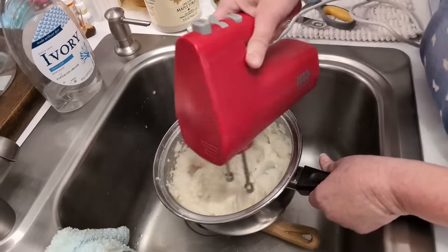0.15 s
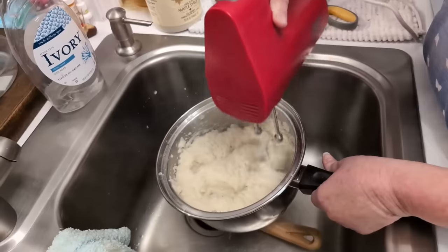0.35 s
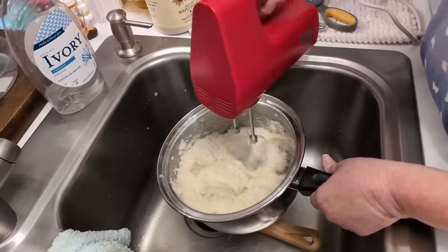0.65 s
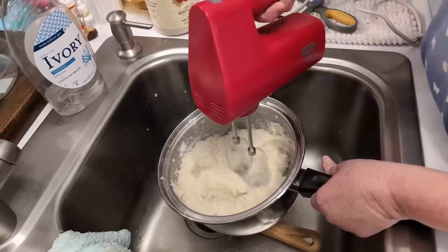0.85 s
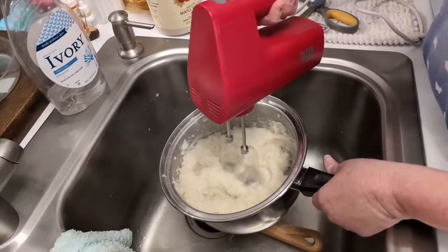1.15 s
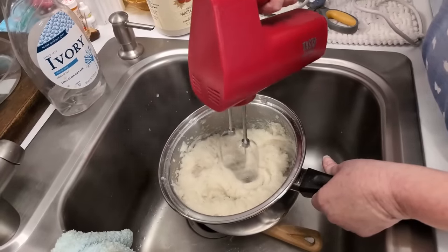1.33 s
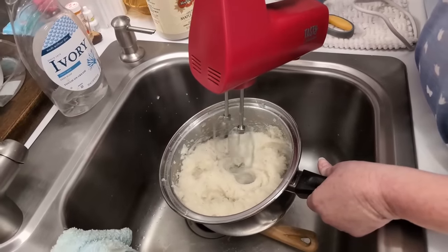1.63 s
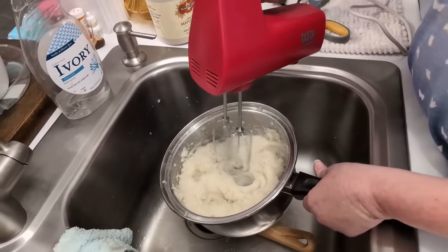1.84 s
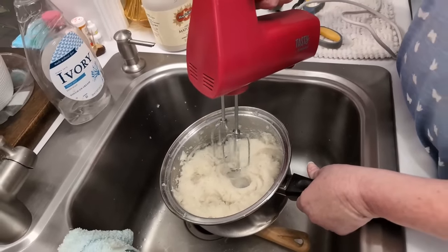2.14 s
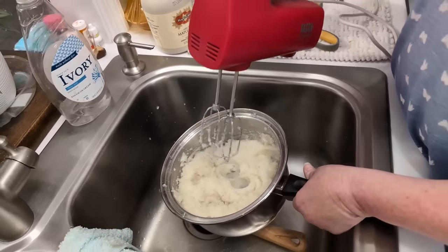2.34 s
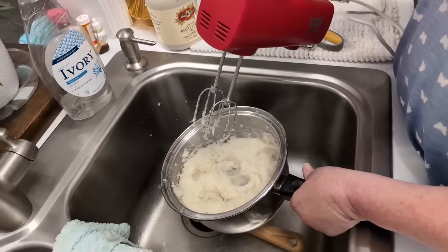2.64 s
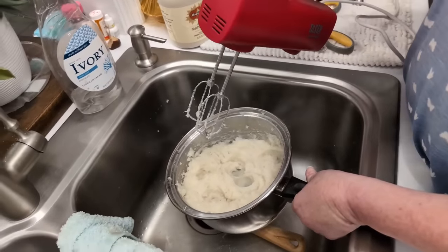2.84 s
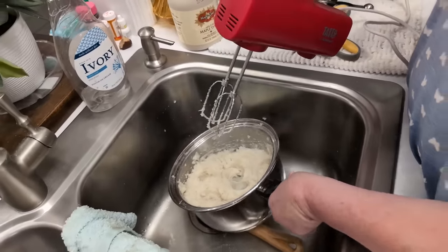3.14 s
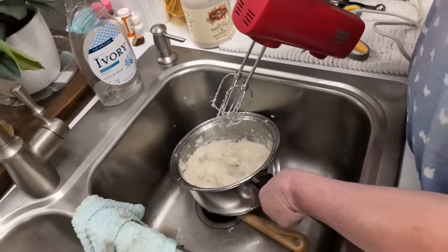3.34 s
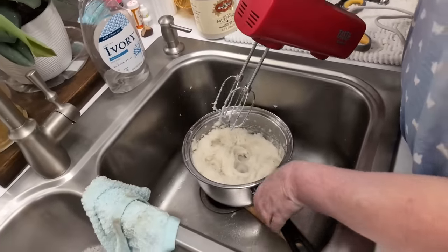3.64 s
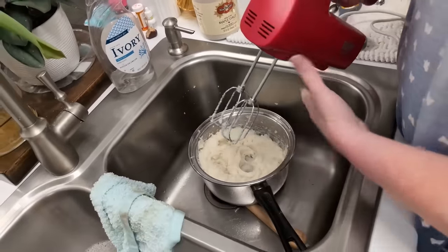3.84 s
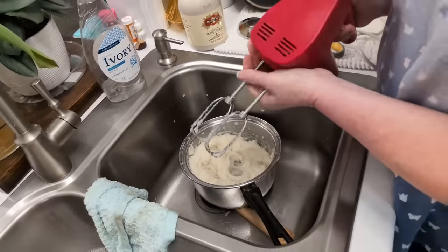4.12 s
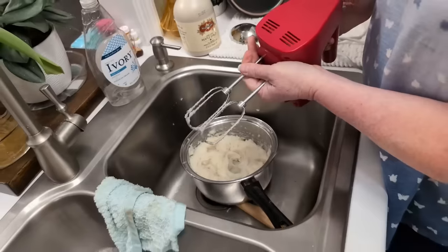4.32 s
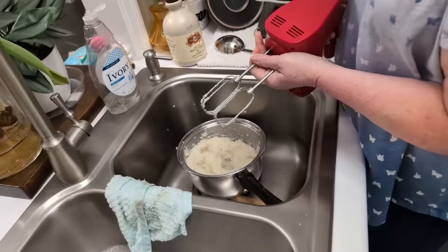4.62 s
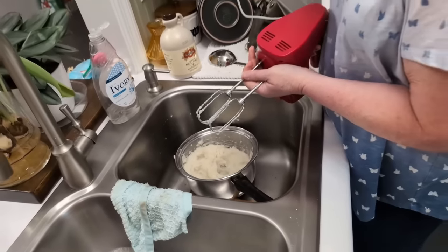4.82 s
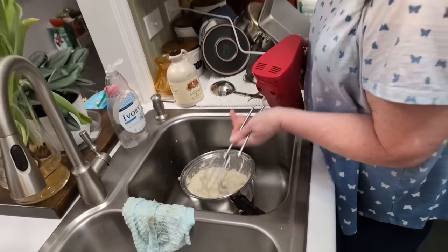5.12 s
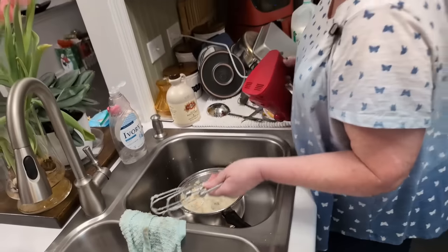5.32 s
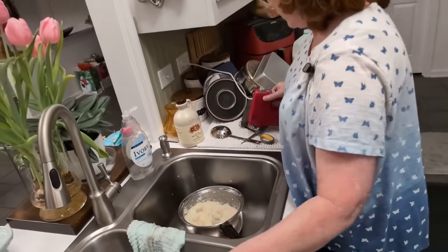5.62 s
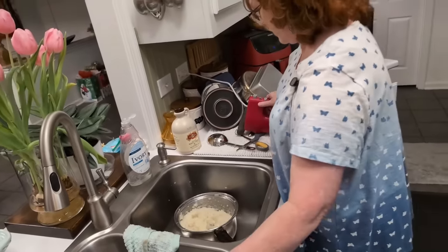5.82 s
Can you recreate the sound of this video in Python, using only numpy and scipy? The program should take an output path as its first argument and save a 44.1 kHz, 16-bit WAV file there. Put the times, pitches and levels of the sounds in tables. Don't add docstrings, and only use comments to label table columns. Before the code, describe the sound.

Electric mixer motor whining over mash, a burst of metallic clatter, a falling coast-down, heavy sink bangs, then small plastic clicks and knocks.

```python
import sys
import numpy as np
from scipy import signal
from scipy.fft import rfft, irfft
from scipy.io import wavfile
from scipy.ndimage import uniform_filter1d

SR = 44100
rng = np.random.default_rng(int(sys.argv[2]) if len(sys.argv) > 2 else 0)


def bounce(signal):
    frames = np.transpose(np.atleast_2d(signal))
    limited = np.clip(frames, -1, 1)
    pcm = np.round(limited * 32767).astype(np.int16)
    wavfile.write(sys.argv[1], SR, pcm)


def invert_db(level):
    return 10 ** (np.asarray(level, dtype=float) / 20)


N = 263277

# multiple of the turning rate, level in dB.
ROTOR_TONES = [(1, -12), (2, -13), (3, -16.5), (4, -18.5), (5, -17.5), (7, -22), (8, -10), (10, -22),
               (11, -32.5), (12, -18.5), (13, -25), (16, -27.5), (17, -25), (19, -33.5), (20, -33),
               (24, -25.5), (26, -39), (28, -37.5), (31, -32.5), (32, -38), (35, -41.5), (36, -46),
               (48, -50.5)]
# multiple of the turning rate, level in dB.
COASTING_TONES = [(1, -13), (3, -6.5), (5, -11), (7, -15), (8, -15), (12, -15), (16, -21), (24, -8),
                  (32, -19), (36, -14), (48, -15)]
# frequency in Hz, level in dB.
RADIATION = [(120, -26), (200, -17), (300, -16), (480, -12), (620, 1.5), (780, 3), (1000, 0), (1250, -5),
             (1900, -5), (2600, -3), (3500, -9), (5200, -8), (6500, -13), (9300, -18)]
# frequency in Hz, level in dB per Hz.
HOUSING_COLOUR = [(88, -48.5), (150, -22.5), (274, -15.5), (308, -9.5), (388, -5.5), (607, -2.5), (751, -7),
                  (1420, -4.5), (1980, -11.5), (2500, -3.5), (2920, -10), (3830, -13.5), (7410, -23),
                  (15500, -42.5)]
# frequency in Hz, width in Hz, level in dB.
CASING = [(620, 370, -3), (985, 45, 7.5), (1400, 70, 3), (2510, 300, -6), (4000, 400, -4.5)]
# start in seconds, level in dB, hold in seconds.
LUMPS = [(0.0, -54, .01), (0.14, -60, .01), (0.23, -55, .01), (0.35, -57, .08), (0.46, -50, .03),
         (0.63, -54, .01), (0.73, -50, .07), (0.88, -66, .04), (1.07, -53, .1), (1.28, -63, .01),
         (2.35, -77, .01), (2.53, -79, .01)]
# start in seconds, peak in dB, lows in dB, highs in dB, wire ring in Hz.
BLADES = [(0.1883, -34, -12, -8, 2470), (0.2008, -17, -10, -4, 5780), (0.2172, -15, -6, -3, 8500),
          (0.2335, -21, -8, -6, 7400), (0.251, -28, -8, 3, 5600), (0.267, -28, -8, 3, 7400),
          (0.283, -33, -8, 2, 5700), (0.3001, -28, -8, 0, 5260), (0.3145, -18, -10, 0, 5820),
          (0.3305, -18, -10, 1, 5730), (0.348, -23, -10, 0, 5700), (0.3634, -13, -7, -5, 7410),
          (0.3799, -11, -7, -7, 7400), (0.397, -13, -7, -8, 7400), (0.413, -15, -6, -11, 6800),
          (0.430, -15, -6, -13, 4500), (0.4482, -15, -6, -10, 3500), (0.4617, -8, -5, -10, 6500),
          (0.478, -12, -5, -13, 3050), (0.495, -22, -5, -10, 3100), (0.511, -30, -6, -10, 6500),
          (1.174, -40, -18, -1, 3074), (1.19, -46, -18, -1, 3074), (1.303, -46, -13, -1, 4150),
          (1.319, -28, -13, -1, 4150), (1.335, -28, -13, -1, 4150), (1.352, -42, -13, -1, 4150)]
# frequency in Hz, width in Hz, level in dB.
WIRES = [(5600, 290, -3), (7400, 50, 2), (6400, 100, -5.5), (11000, 2700, -6.5)]
# frequency in Hz, level in dB, time to fall 60 dB in seconds.
POT = [(285, -8, 0.24), (697, -4, 0.21), (1050, -1.5, 0.06), (1130, -5, 0.11), (2040, -10, 0.096),
       (2720, -9, 0.066), (3026, -12.5, 0.12), (3625, -23, 5.0), (4510, -7.5, 0.049), (5500, -29.5, 0.31),
       (5932, -20, 0.15), (6320, -16, 0.18), (7397, -40.5, 5.0), (7900, -32, 0.38)]
# frequency in Hz, level in dB per Hz.
POT_COLOUR = [(88, -52), (150, -12), (302, -1), (373, -12), (736, 1), (966, -14.5), (1060, 0.5),
              (1830, -17), (2020, -11), (2600, -15), (3160, -15.5), (7410, -14), (15500, -28)]
# start in seconds, peak in dB, lows in dB, highs in dB, main ring in Hz.
DROPS = [(2.792, -56, -29, -10, 1120), (2.908, -47, -16, -34, 3300), (3.281, -36.5, -7.5, -22, 650),
         (3.318, -19, -13, -15.5, 2500), (3.325, -11, -14, -17, 4600), (3.334, -21, -9.5, -17.5, 750),
         (3.381, -11, -9, -15, 775), (3.391, -10, -9, -15, 1010), (3.404, -17, -15, -15, 1750),
         (3.472, -21, -1, -19, 527), (3.486, -30, 3, -30, 1010), (3.515, -36, 0, -40, 520),
         (3.567, -35, 6, -22, 530), (3.610, -16, -11, -48, 1190), (3.714, -35, 7, -44, 545),
         (3.744, -35, 7, -36.5, 530), (3.778, -36, 5, -30, 544), (3.791, -16, -7.5, -26, 2100),
         (3.796, -5, -9, -22, 1400), (3.892, -34, 4, -23, 480), (4.041, -33, -15.5, -24, 2700),
         (4.19, -46, -8, -30, 972), (4.25, -57, -4, -29.5, 1466), (4.284, -54, -14.5, -37, 1410)]
# start in seconds, level in dB.
THUDS = [
    (3.287, -35),
    (3.387, -26),
    (3.476, -17),
    (3.716, -18),
    (3.778, -17),
    (3.7965, -4),
]
# frequency in Hz, width in Hz, level in dB.
SINK = [(342, 13, -9), (520, 14, 3), (729, 32, -1), (761, 20, 0.5), (1030, 18, -1), (1130, 23, -6),
        (1462, 90, -15), (1960, 27, -7), (2290, 58, -7.5), (2623, 56, 0.5)]
# frequency in Hz, level in dB per Hz.
SINK_COLOUR = [(120, -32.5), (200, -5.5), (446, -7.5), (665, -5), (858, -15), (992, -11), (1500, -19),
               (1980, -18), (2560, -12), (2800, -17), (5390, -23), (15500, -45)]
# start in seconds, level in dB, hold in seconds.
BOOM = [(3.07, -72, .08), (3.165, -59, .01), (3.295, -42, .02), (3.345, -30, .03), (3.405, -25, .04),
        (3.476, -37, .01), (3.498, -22, .033), (3.572, -31, .015), (3.59, -30, .015), (3.722, -28, .06),
        (3.806, -15, .026), (3.85, -20, .015), (3.88, -27, .01), (3.93, -31, .045), (4.04, -60, .02),
        (4.11, -67, .1)]
# frequency in Hz, width in Hz, level in dB.
BOWL = [(76, 12, -11), (112, 18, -8), (135.7, 12, 5), (160.7, 14, 2), (195, 21, -4), (255, 42, -10),
        (295, 30, -10), (403.3, 72, -17)]
# frequency in Hz, level in dB.
BOWL_HUM = [(137, 0), (162, -2), (105, -10)]
# start in seconds, level in dB, hold in seconds.
RUSTLE = [
    (3.3, -60, .05),
    (3.66, -53, .15),
    (4.0, -60, .02),
    (4.4, -77, .25),
    (5.0, -69, .3),
    (5.6, -64, .25),
    (5.95, -59, .02),
]
# start in seconds, frequency in Hz, width in Hz, level in dB, time to fall 60 dB in seconds.
CHATTER = [(4.773, 1310, 90, -36, 0.5), (4.766, 520, 204.3, -33, 0.053), (4.766, 152.6, 120.6, -52, 0.05),
           (5.209, 352, 151, -55, 0.064), (5.821, 148, 120, -64, 0.33), (4.775, 1100, 1000, -35, 0.36),
           (4.775, 4000, 3000, -40, .24), (5.22, 1700, 100, -41, 0.15), (5.221, 4100, 900, -56, 0.25),
           (4.79, 1960, 290, -40, .35), (4.86, 1300, 250, -44, .15), (3.612, 2310, 90, -34, .09),
           (3.612, 2770, 90, -41, .08), (3.716, 2250, 450, -42, .1), (3.745, 2150, 450, -45, .1),
           (3.762, 1650, 300, -46, .08), (3.794, 2600, 200, -30, .05), (3.893, 3000, 500, -52, .08),
           (5.498, 1450, 350, -46, 0.2), (5.5, 2350, 300, -50, .15), (5.534, 2050, 150, -31, .04),
           (5.62, 2250, 400, -52, 0.3), (5.625, 1450, 400, -51, .3), (5.815, 1127, 262, -33.5, 0.32),
           (5.843, 1520, 200, -41.5, 0.28), (5.918, 600, 83, -39, 0.068)]
# start in seconds, peak in dB, ring in Hz, time to fall 60 dB in seconds.
TICKS = [
    (5.3718, -44, 10500, 0.11),
    (5.4116, -47, 9800, 0.091),
    (5.6924, -48, 6460, 0.1),
    (5.7144, -44, 10350, 0.1),
    (5.8211, -44.5, 9350, 0.11),
    (5.929, -60, 6340, 0.079),
]
# start in seconds, peak in dB, lows in dB, highs in dB, main ring in Hz.
KNOCKS = [(4.543, -64, -10, -28, 1500), (4.62, -66, -10, -30, 1200), (4.647, -62, -14, -28, 2800),
          (4.737, -68, -20, -10, 5000), (4.712, -63, -14, -28.5, 1673), (4.754, -49, -2, -14, 573),
          (4.764, -30, -5, -25, 770), (4.768, -6, -16, -20, 2580), (4.799, -28, -12.5, -15, 775),
          (5.118, -32, -21, -40.5, 1300), (5.192, -47, -8, -30, 980), (5.205, -37, -18, -24, 2200),
          (5.215, -18, -36, -22, 1855), (5.372, -35, -20, -35.5, 1550), (5.496, -45, -9, -34.5, 1440),
          (5.534, -25, -20.5, -36, 2000), (5.618, -50, -25.5, -36, 2300), (5.637, -52, -25, -36, 1450),
          (5.682, -47, -25, -23.5, 1440), (5.736, -48.5, -22.5, -19.5, 1310), (5.811, -29, -28, -34, 1300),
          (5.82, -27, -12, -27, 1130), (5.839, -21.5, -39, -23, 1647), (5.919, -42, 6, -27.5, 600)]
# frequency in Hz, level in dB, time to fall 60 dB in seconds.
PLASTIC = [(600, -3.5, 0.082), (772, -5, .07), (1120, -6, 0.07), (1300, -15, .3), (1410, -3, .06),
           (1930, -3, 0.07), (2590, -5, 0.063), (4100, -13.5, 0.11)]
# frequency in Hz, level in dB per Hz.
PLASTIC_COLOUR = [(120, -78), (200, -34), (414, -6), (471, -9.5), (596, -3), (1680, -4.5), (2900, -11.5),
                  (4030, -12), (8350, -26.5), (10200, -28.5), (15500, -38.5)]
# frequency in Hz, time to fall 60 dB in seconds.
KITCHEN = [(200, .4), (1000, 0.25), (4000, 0.24), (12000, .1)]
# frequency in Hz, level in dB per Hz.
HUSH_COLOUR = [(41, -33.5), (70, 0.5), (110, 2.5), (254, -7), (535, -2.5), (585, -2.5), (751, -10.5),
               (1030, -5), (1150, -16), (4090, -19), (15500, -32)]

SWITCH_OFF_S, POWER_FADE_S = 1.175, .15
RUNNING_HZ, DRAG_S, FRICTION_HZ = 310.5, 1.7, 200
RUNNING_DB, DB_PER_DECADE, FAN_SHARE_DB = -46.3, 20, 11
LUMP_RISE_DB_PER_S, LUMP_FALL_DB_PER_S = 300, 220
BLADE_T60_S = .07
SCRAPE_T60_S, DULL_S_PER_DB = .14, .002
BOOM_RISE_DB_PER_S, BOOM_FALL_DB_PER_S = 900, 330
RUSTLE_RISE_DB_PER_S, RUSTLE_FALL_DB_PER_S = 55, 42
KNOCK_T60_S, SOFT_S_PER_DB = .04, .0012
HUSH_DB = -79


def rms_one(x):
    return x / np.sqrt(np.mean(x ** 2) + 1e-20)


def at_hz(points, hz):
    table_hz, values = np.array(points)[:, 0], np.array(points)[:, 1]
    return np.interp(np.log(np.maximum(hz, 1)), np.log(table_hz), values)


def drift(rate):
    r = np.exp(-2 * np.pi * 40 * rate / SR)
    steps = rng.standard_normal(N // 40 + 2002)
    slow = signal.lfilter([1], [1, -2 * r, r * r], steps)[2000:]
    return np.interp(np.arange(N) / 40, np.arange(len(slow)), rms_one(slow))


def swells(rows, rise, fall):
    t = np.arange(N) / SR
    levels = []
    for s, db, hold in rows:
        climb = rise * np.maximum(s - t, 0)
        decay = fall * np.maximum(t - s - hold, 0)
        levels.append(db - climb - decay)
    return np.max(levels, axis=0)


def coloured(x, spectrum, size=4096):
    cepstrum = irfft(np.log(invert_db(at_hz(spectrum, np.fft.rfftfreq(size, 1 / SR)))))
    cepstrum[1:size // 2] *= 2
    cepstrum[size // 2 + 1:] = 0
    pulse = irfft(np.exp(rfft(cepstrum)))
    return signal.fftconvolve(x, pulse / np.linalg.norm(pulse))[:len(x)]


def resonate(x, peaks):
    out = 0
    for k, (hz, width, db) in enumerate(peaks):
        r = np.exp(-np.pi * width / SR)
        b = (-1) ** k * invert_db(db) * (1 - r * r) / 2 * np.array([1, 0, -1])
        a = [1, -2 * r * np.cos(2 * np.pi * hz / SR), r * r]
        out = out + signal.lfilter(b, a, x + 1e-18)
    return out


def as_peaks(modes, longest):
    return [(hz, np.log(1000) / np.pi / min(t60, longest), db) for hz, db, t60 in modes]


def contact(t60, low_db, high_db, slide, low_hz, high_hz, patchy_db=5.0, rise=.0011):
    bursts_db = 3.1 * np.minimum(rng.exponential(1, SR // 2), 4)
    grit = rng.standard_normal(SR // 2) * invert_db(bursts_db)
    spots_hz = np.geomspace(900, 12000, 9) * invert_db(rng.uniform(-1.5, 1.5, 9))
    spots_db = patchy_db + rng.normal(0, 3, 9)
    t = np.arange(round(np.clip(t60 + .06, .1, .5) * SR)) / SR
    grit = rms_one(grit)[:len(t)] * np.minimum(t / max(rise, 1e-4), 1)
    low = signal.sosfilt(signal.butter(3, low_hz, fs=SR, output="sos"), grit)
    mid = signal.sosfilt(signal.butter(3, [low_hz, high_hz], "band", fs=SR, output="sos"), grit)
    high = signal.sosfilt(signal.butter(3, high_hz, "high", fs=SR, output="sos"), grit)
    fade_db = -60 * np.maximum(t - abs(slide), 0) / max(t60, .005)
    force = low * invert_db(low_db + 0.72 * fade_db)
    force += mid * invert_db(fade_db)
    force += high * invert_db(high_db + 0.83 * fade_db - 0.0051 * fade_db ** 2)
    return invert_db(-4) * (force + resonate(force, zip(spots_hz, spots_hz / 16, spots_db)))


def add(track, s, sound):
    i = round(s * SR)
    track[i:i + len(sound)] += sound[:N - i]


def motor():
    coasted = np.maximum(np.arange(N) / SR - SWITCH_OFF_S, 0)
    turns = (RUNNING_HZ + FRICTION_HZ) * np.exp(-coasted / DRAG_S) - FRICTION_HZ
    turns = uniform_filter1d(np.maximum(turns, .01), size=3000)
    speed = turns / RUNNING_HZ
    noise_db = RUNNING_DB + DB_PER_DECADE * np.log10(speed) - FAN_SHARE_DB * (1 - speed)
    waver = 1 + 0.001 * drift(25) + .003 * drift(2)
    phase = 2 * np.pi * np.cumsum(turns * waver) / SR
    powered = np.exp(-coasted / POWER_FADE_S)
    flutter_db = [2.7 * drift(14) for _ in range(5)]

    driven, coasting = np.zeros(N), np.zeros(N)
    for k, db in ROTOR_TONES:
        k = round(k)
        driven += invert_db(db + flutter_db[k % 5]) * np.sin(k * phase + k * k)
    for k, db in COASTING_TONES:
        k = round(k)
        tone_db = db + at_hz(RADIATION, k * turns) + .9 * flutter_db[k % 5] - 1.5
        coasting += invert_db(tone_db) * np.sin(k * phase + k * k)
    coasting *= (1 - powered) * invert_db(11 - 11 * turns / 311)
    tones = invert_db(1.5) * powered ** 1.5 * driven + coasting

    gusts = invert_db(.8 * drift(40))
    air = coloured(rng.standard_normal(N), HOUSING_COLOUR) * (1 + .15 * np.sin(phase)) * gusts
    air = rms_one(air) + invert_db(-6 - 2.9 * powered) * resonate(air, CASING)
    hiss_band = signal.butter(2, [4500, 9500], "band", fs=SR, output="sos")
    hiss = signal.sosfilt(hiss_band, rng.standard_normal(N))
    return invert_db(noise_db) * (invert_db(-3.5) * air + invert_db(-11) * (1 - powered) * hiss + tones)


def rumble():
    push = rng.standard_normal(N) * invert_db(3 * drift(9))
    shake = resonate(push, [(76, 30, -1), (58, 17, -5), (125, 10, -18)])
    return invert_db(swells(LUMPS, LUMP_RISE_DB_PER_S, LUMP_FALL_DB_PER_S)) * rms_one(shake)


def beaters():
    force, wire = np.zeros(N), np.zeros(N)
    for s, db, low_db, high_db, ring_hz in BLADES:
        touch = invert_db(db - 6.5) * contact(BLADE_T60_S, low_db, high_db, slide=0.003, low_hz=1500,
                                        high_hz=4970, patchy_db=0.0, rise=.0003)
        add(force, s, touch)
        add(wire, s, resonate(touch, [(ring_hz, 250, 6.5)]))
    wire += invert_db(-4.5) * resonate(force, WIRES)
    pot = invert_db(11) * resonate(force, as_peaks(POT, longest=.09))
    return coloured(force, POT_COLOUR) + wire + pot


def pot_in_sink():
    force, local, blows = np.zeros(N), np.zeros(N), np.zeros(N)
    for s, db, low_db, high_db, ring_hz in DROPS:
        t60 = SCRAPE_T60_S + DULL_S_PER_DB * high_db
        touch = invert_db(db - 9.5) * contact(t60, low_db + 5.5, high_db + 18.5, slide=0.087 * t60,
                                        low_hz=1500, high_hz=4900, patchy_db=0.0)
        touch = coloured(touch, SINK_COLOUR)
        add(force, s, touch)
        add(local, s, resonate(touch, [(ring_hz, 60, 9)]))
    for s, db in THUDS:
        add(blows, s, -invert_db(db) * np.hanning(round(.0016 * SR)))

    shaking = rng.standard_normal(N) * invert_db(2 * drift(30))
    hum = np.zeros(N)
    for hz, db in BOWL_HUM:
        level = invert_db(db + 2.0 * drift(15))
        wavering_hz = hz * (1 + .05 * drift(15))
        hum += level * np.sin(2 * np.pi * np.cumsum(wavering_hz) / SR)
    boom = rms_one(hum) + invert_db(-4) * rms_one(resonate(shaking, BOWL))
    boom_db = swells(BOOM, BOOM_RISE_DB_PER_S, BOOM_FALL_DB_PER_S)

    struck = np.diff(blows, prepend=0) * 10 * invert_db(-3)
    struck += invert_db(16) * resonate(blows, BOWL) + invert_db(4) * resonate(blows, SINK)
    struck += resonate(blows, [(165, 100, 5), (620, 300, 0)])
    return force + local + invert_db(8) * resonate(force, SINK) + invert_db(boom_db - 3.5) * boom + struck


def rustle():
    clumps_db = 2.5 * drift(20)
    grains_db = 0.93 * rng.exponential(1, N).clip(0, 5)
    grains = rng.standard_normal(N) * invert_db(grains_db + clumps_db)
    soft = coloured(grains, [(150, -6.5), (600, 6), (2500, -0.5), (6000, -16.5), (15000, -34)])
    level_db = swells(RUSTLE, RUSTLE_RISE_DB_PER_S, RUSTLE_FALL_DB_PER_S)
    return invert_db(level_db - 4.5) * rms_one(soft)


def loose_parts():
    out = np.zeros(N)
    for s, hz, width, db, t60 in CHATTER:
        shake = contact(t60, 0, 0, slide=0.0052, low_hz=900, high_hz=4640, patchy_db=-17.5)
        ring = resonate(shake, [(hz, width, 0)])
        ring = resonate(ring, [(hz, width, -10 * np.log10(width / SR))])
        add(out, s, invert_db(db) * ring)
    for s, db, ring_hz, t60 in TICKS:
        tick = invert_db(db - 9) * contact(t60, -60, 0, slide=0.0041, low_hz=900, high_hz=6130)
        tick = signal.sosfilt(signal.butter(4, .85 * ring_hz, "high", fs=SR, output="sos"), tick)
        add(out, s, tick + resonate(tick, [(ring_hz, 400, 4)]))
    return out


def handling():
    force, local = np.zeros(N), np.zeros(N)
    for s, db, low_db, high_db, ring_hz in KNOCKS:
        t60 = KNOCK_T60_S - SOFT_S_PER_DB * db
        touch = invert_db(db - 9.5) * contact(t60, low_db + 14, high_db + 14, slide=0.0056, low_hz=900,
                                        high_hz=4400, patchy_db=-6.0)
        add(force, s, touch)
        add(local, s, resonate(touch, [(ring_hz, 70, 14)]))
    shell = invert_db(10.5) * resonate(force, as_peaks(PLASTIC, longest=.4))
    return coloured(force, PLASTIC_COLOUR) + local + shell


def kitchen(x):
    t, tail = np.arange(SR // 2) / SR, 0
    for hz in 90 * 2. ** np.arange(8):
        band = signal.butter(2, [hz / np.sqrt(2), hz * np.sqrt(2)], "band", fs=SR, output="sos")
        noise = signal.sosfilt(band, rng.standard_normal(len(t)))
        tail = tail + noise * invert_db(-60 * t / at_hz(KITCHEN, hz))
    tail *= np.clip(t / 0.004, 0, 1)
    return signal.fftconvolve(x, tail / np.linalg.norm(tail))[:N]


def scene():
    near = motor() + rumble() + beaters() + pot_in_sink() + rustle() + loose_parts() + handling()
    hush = invert_db(HUSH_DB) * coloured(rng.standard_normal(N), HUSH_COLOUR)
    return (near + invert_db(-19) * kitchen(near) + hush)[None]


def band_limit(x):
    return signal.sosfilt(signal.butter(12, 15780, fs=SR, output="sos"), x)


def record(dry):
    cut = signal.sosfilt(signal.butter(4, 52, "high", fs=SR, output="sos"), dry)
    cut = signal.sosfilt(signal.cheby2(12, 60, 16050, fs=SR, output="sos"), cut)
    offset = -.0003
    return band_limit(cut + offset)


dry = scene()
out = record(dry)
bounce(out)
```